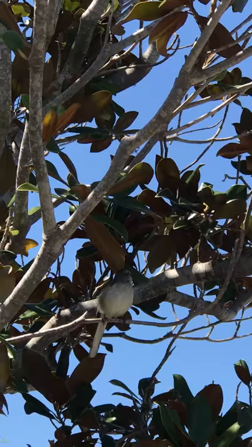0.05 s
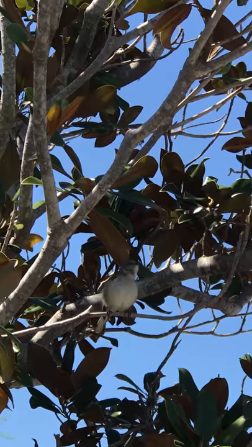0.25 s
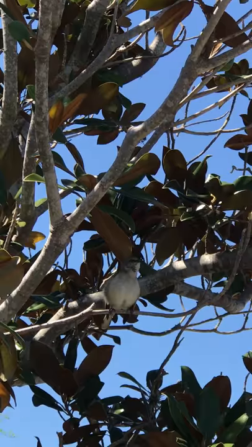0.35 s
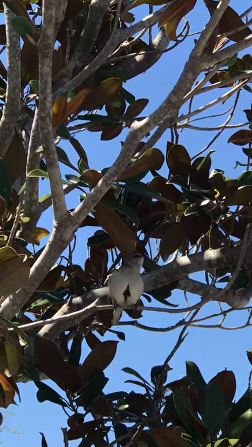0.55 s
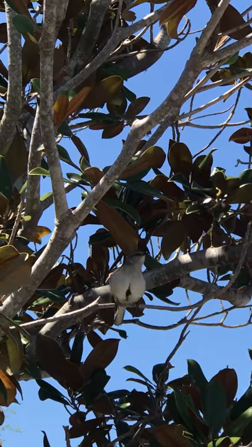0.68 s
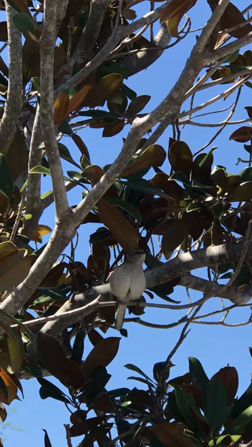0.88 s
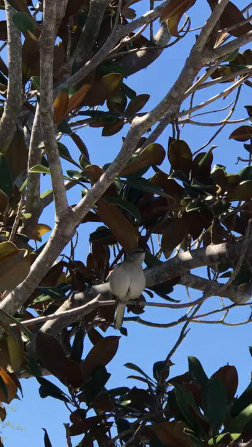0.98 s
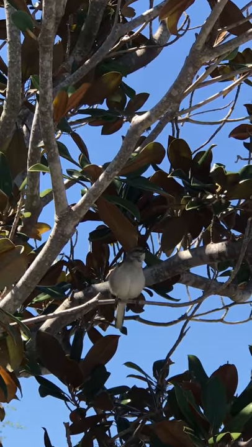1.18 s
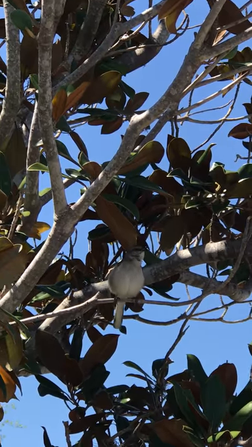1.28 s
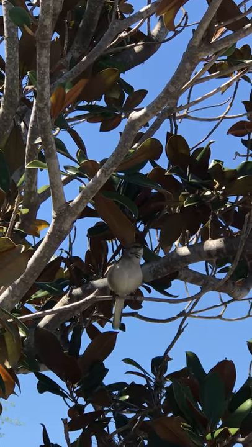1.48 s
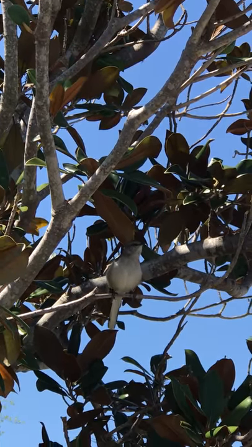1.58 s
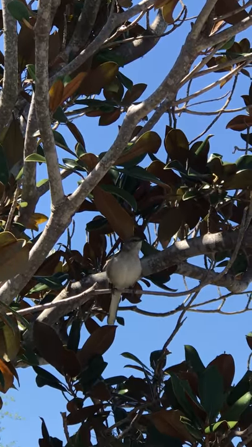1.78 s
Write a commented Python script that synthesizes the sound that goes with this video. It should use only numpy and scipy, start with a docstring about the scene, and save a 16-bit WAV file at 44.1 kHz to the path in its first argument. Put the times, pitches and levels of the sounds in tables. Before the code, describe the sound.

A bird in a leafy tree gives two similar high whistles, each sagging in pitch, climbing back and dropping to a short closing note. Wind rumbles and thumps on the microphone, and distant traffic hums throughout.

```python
"""Distant traffic hums and wind buffets the microphone throughout. At 0.2 s a bird in a leafy tree
opens with a faint low grace note, then a whistle that sags in pitch, climbs again and breaks down
to a short, slightly airy closing note. Branches and leaves scatter the sound.
A second call of the same shape follows at 1.2 s and dies away under the wind."""
import sys
import numpy as np
from scipy import signal
from scipy.fft import rfft, irfft
from scipy.io import wavfile

SR = 44100
rng = np.random.default_rng(int(sys.argv[2]) if len(sys.argv) > 2 else 0)


def dump(signal):
    """Clip the signal to [-1, 1] and save it as 16-bit WAV at the path in sys.argv[1]."""
    limited = np.clip(np.atleast_2d(signal).T, -1, 1)
    pcm = np.round(limited * 32767).astype(np.int16)
    wavfile.write(sys.argv[1], SR, pcm)


N = 81585
T = np.arange(N) / SR


def from_db(db):
    """Decibels to gain."""
    return 10 ** (np.asarray(db) / 20)


def unit_rms(x):
    """Scale to unit power."""
    return x / np.sqrt(np.mean(x ** 2) + 1e-20)


def curves(rows):
    """Columns of a time table, interpolated to every sample."""
    time_s, *columns = np.transpose(rows)
    return [np.interp(T, time_s, column) for column in columns]


def drift(rate_hz):
    """Smooth random wander, unit RMS."""
    pole = np.exp(-2 * np.pi * rate_hz / SR)
    wander = signal.lfilter([1], [1, -2 * pole, pole * pole], rng.standard_normal(N + SR))
    return unit_rms(wander[SR:])


def noise(spectrum):
    """Noise shaped on a log-frequency axis, unit RMS."""
    freq_hz, density_db = np.transpose(spectrum)
    bin_hz = np.arange(N + 1) * SR / (2 * N)
    bin_db = np.interp(np.log(np.maximum(bin_hz, 1)), np.log(freq_hz), density_db)
    return unit_rms(irfft(rfft(rng.standard_normal(2 * N)) * from_db(bin_db))[:N])


def gate(start_s, end_s, edge_s=.0047):
    """Soft-edged window."""
    inside_s = np.minimum(T - start_s, end_s - T)
    return np.sin(np.pi / 2 * np.clip(inside_s / edge_s + .5, 0, 1)) ** 2


def jittered_phase(pitch_hz, depth, rate_hz):
    """Running phase of a pitch that wanders by the RMS fraction depth."""
    return 2 * np.pi * np.cumsum(pitch_hz * (1 + depth * drift(rate_hz))) / SR


# Traffic spectrum: freq_hz, relative_db
TRAFFIC_SPECTRUM = [(25, -19), (62, 4.5), (130, -2.5), (300, -10.5), (500, -11.5), (700, -9), (1000, -5.5),
                    (1300, -11.5), (2100, -20), (3200, -27.5), (5000, -39), (8000, -46), (15500, -56)]


def traffic(level_db=-42.5, waver_db=1.2):
    """Distant traffic: a low, slightly wavering hum."""
    return from_db(level_db + waver_db * drift(rate_hz=12)) * noise(TRAFFIC_SPECTRUM)


def eddy(start_s, peak_db, start_hz, rise_s, end_hz=59.7):
    """A brief, uneven pressure swing that slows as it dies."""
    age_rises = np.maximum(T - start_s, 0) / rise_s
    pitch_hz = end_hz + (start_hz - end_hz) * np.exp(-age_rises / 1.52)
    swell = age_rises * np.exp(1 - np.minimum(age_rises, 40))
    phase = jittered_phase(pitch_hz * (age_rises > 0), depth=.16, rate_hz=220)
    return -from_db(peak_db) * swell * np.sin(phase)


# Wind rumble spectrum: freq_hz, relative_db
WIND_SPECTRUM = [(20, -25.5), (40, 0), (65, 4), (130, -4.5), (220, -9), (350, -17.5), (600, -30.5),
                 (1200, -64.5)]
# Gust strength: time_s, level_db
GUSTS = [(0.04, -32.5), (0.2, -35), (0.236, -26.5), (0.336, -45.5), (0.372, -26.5), (0.452, -30.5),
         (0.574, -30), (0.608, -33), (0.916, -35.5), (0.936, -30), (0.982, -43), (1.018, -32.5),
         (1.274, -42), (1.314, -35), (1.496, -33.5), (1.526, -44), (1.788, -36), (1.85, -35)]
# Eddies thumping the microphone: start_s, peak_db, start_hz, rise_s
STRONG_EDDIES = [(0.228, -20.5, 461, 0.0024), (0.247, -24, 408, 0.0023), (0.281, -24, 475, 0.0028),
                 (0.3633, -20.5, 475, 0.0034), (0.391, -23.5, 400, 0.0027), (0.407, -26.5, 224, 0.0078),
                 (0.43, -28.5, 266, 0.0068), (0.482, -22.5, 355, 0.0023), (0.517, -21, 221, 0.0034),
                 (0.534, -22, 322, 0.002), (0.557, -23, 381, 0.0047), (0.577, -19, 230, 0.0023),
                 (0.618, -25, 296, 0.0036), (0.656, -28, 170, .005), (0.783, -26, 110, 0.0069),
                 (0.926, -20.5, 260, 0.0035), (0.991, -28, 365, 0.0039), (1.040, -25.5, 347, 0.005),
                 (1.463, -25, 234, 0.006), (1.488, -25, 403, 0.0025)]


def wind(trim_db=-1.5, small_eddies_per_s=29):
    """Wind on the microphone: strong eddies, plus rumble and small eddies scaled by the gusts."""
    gust_db, = curves(GUSTS)
    gust_gain = from_db(gust_db + trim_db)
    rumble = gust_gain * noise(WIND_SPECTRUM)
    strong = sum(eddy(*row) for row in STRONG_EDDIES)
    arrivals = rng.random(N) < small_eddies_per_s / SR
    kicks = arrivals * (2 * rng.random(N) - 1) * gust_gain
    small = signal.fftconvolve(kicks, eddy(0, 0, start_hz=214, rise_s=.003))[:N]
    return rumble + strong + small


def tail(x, t60_s, rise_s=.022):
    """Dense decaying reflections, unit gain."""
    response = rng.standard_normal(N) * from_db(-60 * T / t60_s) * (1 - np.exp(-T / rise_s))
    return signal.fftconvolve(x, response / np.linalg.norm(response))[:N]


# Echoes off nearby branches: delay_s, gain_db
BRANCH_ECHOES = [(0.0075, -27), (0.016, -15), (0.029, -19.5)]


def tree(direct, far_cutoff_hz=2750):
    """Direct sound, branch echoes, leaf scatter and a dull tail from further away."""
    echoes = sum(from_db(gain_db) * np.interp(T - delay_s, T, direct)
                 for delay_s, gain_db in BRANCH_ECHOES)
    leaves = from_db(-22.5) * tail(direct, t60_s=.13)
    dull = signal.sosfilt(signal.butter(6, far_cutoff_hz, fs=SR, output="sos"), direct)
    far = from_db(-19) * tail(dull, t60_s=.48)
    return direct + echoes + leaves + far


# Beak hiss spectrum: freq_hz, relative_db
BEAK_SPECTRUM = [(2500, -1.5), (3500, 12), (5500, 3), (7200, -3), (8800, -8.5), (10500, -20.5),
                 (12500, -10), (14000, -4.5), (15800, -9)]
# Closing-note rasp spectrum: freq_hz, relative_db
RASP_SPECTRUM = [(2500, -13.5), (6000, -10), (7300, -18), (8600, -14), (10200, -27.5), (12800, -21),
                 (13700, 4.5), (15500, 0.5), (16200, -7.5)]


def breath(break_s, hiss_db, rasp_db, rasp_s, rise_db_per_s=125.5, fall_db_per_s=124.5):
    """Air in the beak: hiss peaks as the bird presses to the pitch break, then a short rasp."""
    age_s = T - break_s
    below_peak_db = np.maximum(-rise_db_per_s * age_s, fall_db_per_s * age_s)
    hiss = from_db(hiss_db - below_peak_db) * noise(BEAK_SPECTRUM)
    rasp_gain = from_db(rasp_db - 60 * age_s) * gate(break_s, break_s + rasp_s)  # fades 60 dB/s
    return hiss + rasp_gain * noise(RASP_SPECTRUM)


def grace_note(start_s, length_s, start_hz, end_hz, level_db, octave_db=-20):
    """A faint, rough falling note just before the whistle catches."""
    end_s = start_s + length_s
    pitch_hz = np.interp(T, [start_s, end_s], [start_hz, end_hz])
    phase = jittered_phase(pitch_hz, depth=.045, rate_hz=1100)
    tone = np.sin(phase) + from_db(octave_db) * np.sin(2 * phase)
    return np.sqrt(2) * from_db(level_db) * gate(start_s, end_s) * tone


def whistle(pitch, loudness, overtones, shimmer_db=.9, flutter_db=3.2, overtone_trim_db=-1.5):
    """A nearly pure gliding tone with weak, fluttering harmonics."""
    pitch_hz, = curves(pitch)
    level_db, = curves(loudness)
    phase = jittered_phase(pitch_hz, depth=.0035, rate_hz=130)
    tone = from_db(level_db + shimmer_db * drift(rate_hz=82)) * np.sin(phase)
    for harmonic, harmonic_db in enumerate(curves(overtones), 2):
        gain = from_db(harmonic_db + overtone_trim_db + flutter_db * drift(rate_hz=70))
        tone += gain * np.sin(harmonic * phase)
    return np.sqrt(2) * tone


# Whistle pitch, per call: time_s, pitch_hz
CALL_PITCH = [
    [(0.239, 3340), (0.247, 3356), (0.268, 3168), (0.335, 2917), (0.39, 2819), (0.42, 2843), (0.47, 2890),
     (0.535, 3113), (0.562, 3151), (0.581, 3136), (0.592, 2820), (0.604, 2634), (0.612, 2663),
     (0.625, 2777)],
    [(1.185, 3200), (1.193, 3324), (1.215, 3165), (1.32, 2957), (1.332, 2875), (1.463, 2964), (1.509, 3114),
     (1.545, 3191), (1.551, 3335), (1.555, 2944), (1.562, 2736), (1.572, 2679), (1.592, 2681),
     (1.617, 2658)],
]
# Fundamental level, per call: time_s, level_db
CALL_LOUDNESS = [
    [(0.239, -38.5), (0.251, -25.5), (0.29, -26), (0.3, -22), (0.335, -25), (0.36, -33), (0.39, -34.5),
     (0.44, -36.5), (0.469, -30), (0.538, -25.5), (0.56, -17.5), (0.581, -19.5), (0.616, -28),
     (0.626, -32.5)],
    [(1.185, -41.5), (1.193, -28.5), (1.235, -25.5), (1.28, -27.5), (1.335, -33.5), (1.40, -30.5),
     (1.507, -27), (1.529, -18), (1.543, -24.5), (1.551, -39), (1.556, -20), (1.61, -30.5), (1.617, -52)],
]
# Harmonic levels before trim, per call: time_s, second_db, third_db, fourth_db, fifth_db
CALL_OVERTONES = [
    [(0.239, -72.5, -83, -88, -95), (0.255, -50.5, -82.5, -84, -90), (0.275, -56.5, -63.5, -78, -79.5),
     (0.31, -62.5, -61, -74, -64), (0.36, -62.5, -76.5, -76.5, -64), (0.43, -67, -90, -89.5, -81.5),
     (0.48, -55.5, -78.5, -74, -69.5), (0.52, -63.5, -65, -77, -59), (0.555, -52.5, -61.5, -73, -59),
     (0.58, -54, -61, -74, -59), (0.592, -53.5, -51.5, -74, -52.5), (0.617, -53.5, -58.5, -75, -53),
     (0.626, -56, -67, -72, -67.5)],
    [(1.185, -69, -83, -88.5, -98), (1.21, -50, -75, -88, -88), (1.25, -59.5, -57, -83.5, -68.5),
     (1.33, -63.5, -69.5, -87.5, -74), (1.41, -62, -77, -88, -76), (1.47, -60, -67, -79, -66),
     (1.5, -56.5, -58.5, -81, -60.5), (1.549, -52, -67, -86, -75.5), (1.557, -61.5, -52, -82, -56),
     (1.585, -54.5, -56.5, -68, -59), (1.605, -54, -65, -71, -59.5), (1.617, -74, -82, -78, -66)],
]
# Breath at each pitch break: break_s, hiss_db, rasp_db, rasp_s
CALL_BREAKS = [(0.572, -61, -62, .04), (1.564, -54.5, -61, 0.044)]
# Opening grace notes: start_s, length_s, start_hz, end_hz, level_db
GRACE_NOTES = [(0.221, 0.021, 2670, 2480, -52), (1.166, 0.020, 2910, 2660, -48.5)]


def bird():
    """Two breathy whistled calls, each led by a grace note."""
    calls = np.zeros(N)
    for pitch, loudness, overtones, pitch_break in zip(
            CALL_PITCH, CALL_LOUDNESS, CALL_OVERTONES, CALL_BREAKS):
        window = gate(start_s=loudness[0][0], end_s=loudness[-1][0])
        calls += window * (whistle(pitch, loudness, overtones) + breath(*pitch_break))
    return calls + sum(grace_note(*row) for row in GRACE_NOTES)


def scene():
    """The bird in its tree over traffic and wind, mono."""
    song = bird()
    return (traffic() + tree(song) + wind())[None]


def record(dry, start_s=.03, cutoff_hz=15900):
    """A moment of opening silence and a steep low-pass."""
    lowpass = signal.ellip(12, .1, 80, cutoff_hz, fs=SR, output="sos")
    return signal.sosfilt(lowpass, dry * gate(start_s, np.inf))


dry = scene()
out = record(dry)
dump(out)
```